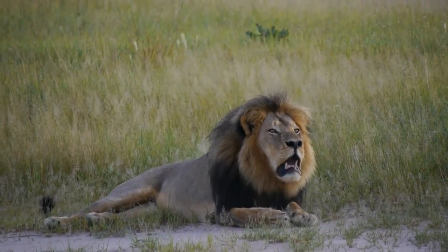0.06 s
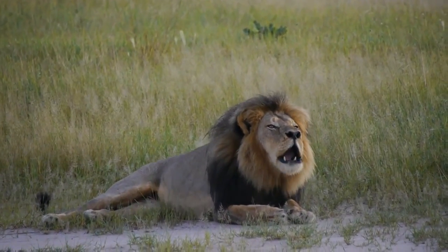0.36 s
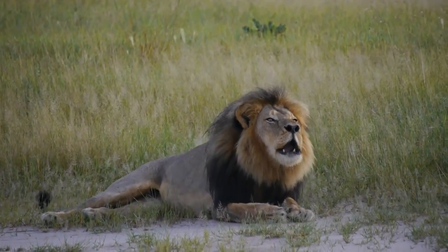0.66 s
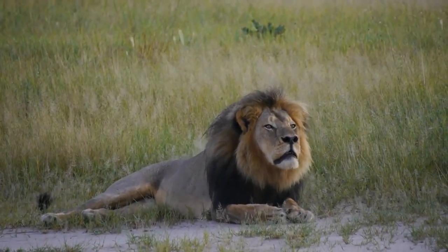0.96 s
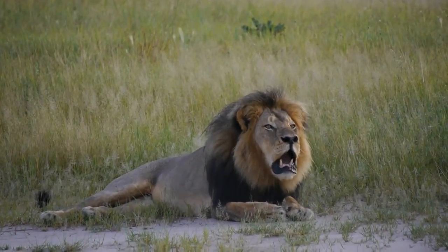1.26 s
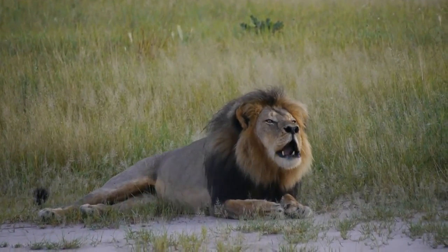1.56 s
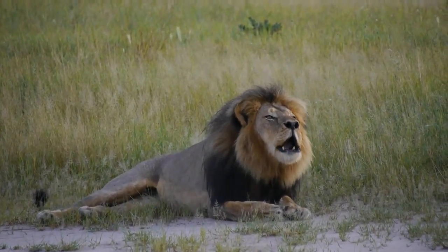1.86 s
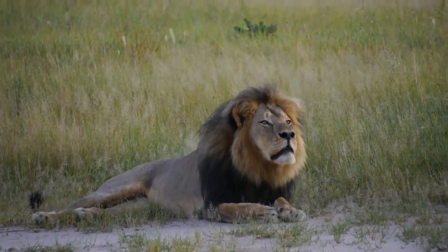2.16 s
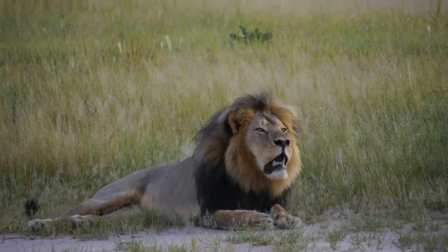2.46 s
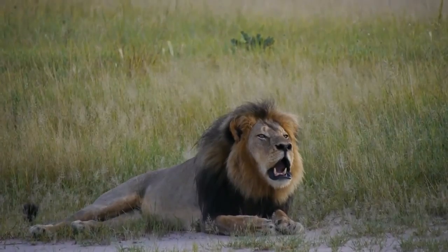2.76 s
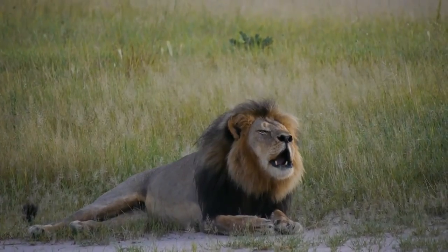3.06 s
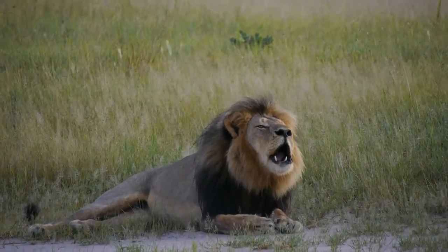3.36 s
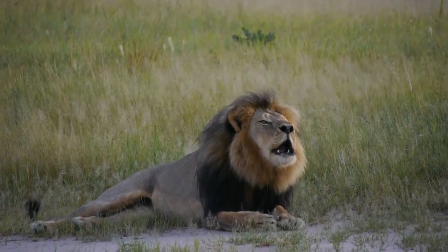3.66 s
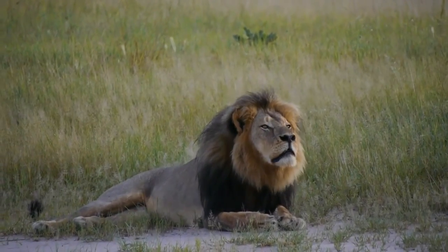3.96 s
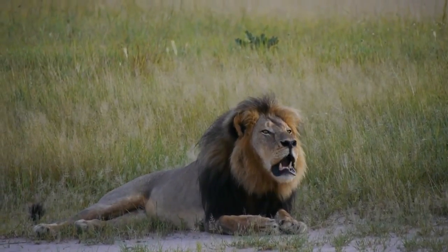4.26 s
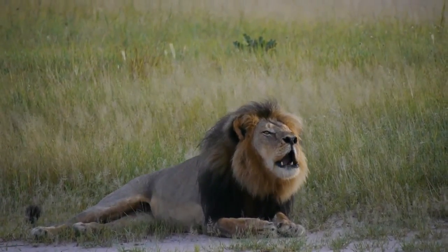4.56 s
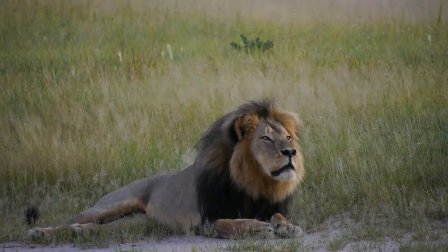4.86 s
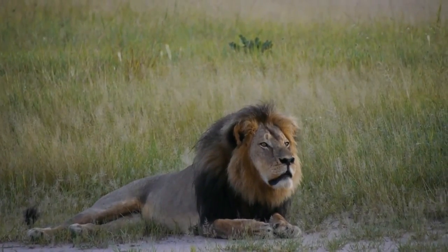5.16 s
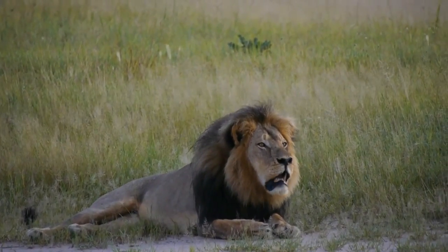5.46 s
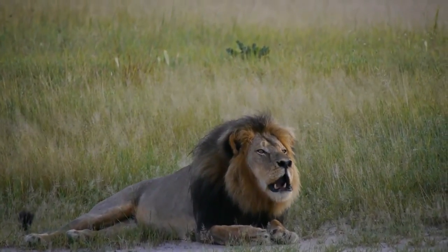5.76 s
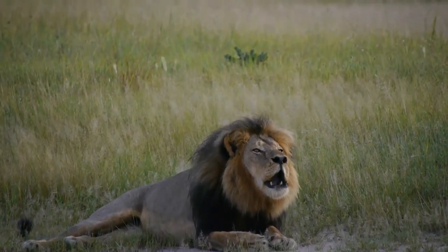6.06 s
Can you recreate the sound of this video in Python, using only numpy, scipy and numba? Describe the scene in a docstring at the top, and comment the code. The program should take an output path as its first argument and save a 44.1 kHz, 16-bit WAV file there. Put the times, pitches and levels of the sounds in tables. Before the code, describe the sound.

A lion roars five times in quiet open grassland, clear in the foreground, with a soft inhale before each call. The roars are deep, rough and raspy, swelling and then sagging in pitch, and the first four end in throaty gulps. Two short roars come at about 0.4 and 1.6 seconds, each lasting around half a second. The longest runs from 3.0 to 3.9 seconds, strained and breaking in the middle. A shorter, quieter one follows at 4.6 seconds, and the last begins at about 5.9 seconds. Each leaves a faint, low echo rolling across the plain. Far away, small birds give thin falling whistles and brief buzzes, busiest between 2 and 3 seconds and again from 4 to 5. Tiny dry ticks sound at the start and near 2.1 and 3.9 seconds, over a faint, wide hush of still air.

```python
"""A lion roars in grassland

A lion gives five deep roars that swell, hold and sag; the first four end in throaty gulps. Its heavy vocal
folds beat unevenly, splitting into strong and weak beats in the longest roar. Throat and mouth ring, and
air rasps once a cycle. Grass scatters the treble and far trees return the bass. Small birds whistle and
buzz in the distance, and dry ticks sound over a faint hush."""
import sys
import numpy as np
from scipy import signal
from scipy.fft import rfft, irfft, next_fast_len
from scipy.io import wavfile
from scipy.ndimage import uniform_filter1d, minimum_filter1d
from numba import njit

SR = 44100
rng = np.random.default_rng(int(sys.argv[2]) if len(sys.argv) > 2 else 0)


def file_out(sig):
    """Save sig as 16-bit WAV at sys.argv[1]."""
    # one column per channel
    cols = np.atleast_2d(sig).T
    # limit, then scale
    lim = np.clip(cols, -1, 1)
    pcm = np.round(lim * 32767).astype(np.int16)
    wavfile.write(sys.argv[1], SR, pcm)


N = 269803
TIME = np.arange(N) / SR


def undb(db):
    """Turn decibels into a multiplier."""
    return 10 ** (np.asarray(db) / 20)


def unit(x):
    """Scale a sound so its average power is 1."""
    return x / np.sqrt(np.mean(x ** 2))


def steady(x, size=2200):
    """Even out slow changes in loudness; single beats keep their differences."""
    power = uniform_filter1d(uniform_filter1d(x ** 2, size), size // 2)
    return x / np.sqrt(np.abs(power) + 1e-12)


def noise():
    return rng.standard_normal(N)


def band(x, lo_hz, hi_hz, order=4):
    """Keep what lies between two frequencies."""
    return signal.sosfilt(signal.butter(order, [lo_hz, hi_hz], "band", fs=SR, output="sos"), x)


def band_noise(lo_hz, hi_hz, order=2):
    """Noise between two frequencies; a very low band makes a random wobble."""
    return unit(band(noise(), lo_hz, hi_hz, order))


def colour(x, points):
    """Shape the bass and treble along (frequency_hz, gain_db) points."""
    hz, db = np.transpose(points)
    size = next_fast_len(len(x) + SR // 10)
    freq = np.maximum(np.arange(size // 2 + 1) * SR / size, 1)
    gain = undb(np.interp(np.log(freq), np.log(hz), db))
    return irfft(rfft(x, size) * gain, size)[:len(x)]


@njit
def moving_filter(x, hz, width_hz):
    """Pass a band of sound whose centre can move at every sample."""
    out, band_state, low_state = np.empty(len(x)), 0., 0.
    for i in range(len(x)):
        tuning, damping = np.tan(np.pi * hz[i] / SR), width_hz / hz[i]
        swing = (band_state + tuning * (x[i] + 1e-18 - low_state)) / (1 + tuning * (tuning + damping))
        band_state = 2 * swing - band_state
        low_state += 2 * tuning * swing
        out[i] = damping * swing
    return out


def ring(x, hz, width_hz):
    """One resonance: a pitch, still or moving, at which a hollow space rings."""
    return moving_filter(x, hz * np.ones(N), float(width_hz))


def pipe(x, resonances, scale=1):
    """The steep resonances of a pipe; neighbours swing in opposite directions."""
    return sum((-1) ** k * undb(db) * ring(ring(x, hz * scale, width), hz * scale, width)
               for k, (hz, width, db) in enumerate(resonances))


def add(out, start_s, sound):
    """Mix a sound in at a given time."""
    i = int(start_s * SR)
    out[i:i + len(sound)] += sound[:N - i]


def bump(at_s, half_s):
    """A smooth rise and fall around a time."""
    return np.exp(-((TIME - at_s) / half_s) ** 2)


# The tone of still air over the plain: frequency_hz, relative_db
AIR_TONE = [(26, -55), (45, 0.5), (70, -9.5), (123, 2), (190, -7.5), (359, -4.5), (494, -15.5),
            (825, -11.5), (1310, -23), (1450, -14), (1720, -24.5), (4040, -26.5), (5830, -32),
            (13400, -37.5), (15500, -55)]

def still_air(level_db=-50.5, swell_db=2):
    """A faint, wide hush that swells in the bass, with a low boom dying away at the start."""
    mid, side = (unit(colour(noise(), AIR_TONE)) for _ in range(2))
    side = colour(side, [(30, 14), (120, -21), (500, -4.5), (1300, -2.5), (3000, 3), (12000, 2.5)])
    swell = undb(swell_db * band_noise(1, 1.03, order=1)) - 1
    mid = mid + swell * colour(mid, [(500, 3.5), (2000, -23)])
    boom = undb(-41.5 - 42 * TIME) * band_noise(132, 162)
    return undb(level_db) * np.array([mid + side, mid - side]) + boom


# Small dry ticks: start_s, relative_db
DRY_TICKS = [(0.027, -30), (0.0418, -34.5), (0.0815, -33.5), (0.115, -29), (0.8857, -40), (2.0714, -31),
             (2.113, -35), (2.144, -27.5), (2.904, -38.5), (3.8294, -32), (3.867, -34), (3.899, -27.5)]

def ticks(decay_s=0.0053):
    """Tiny bursts of noise make dry crackles."""
    out, t = np.zeros(N), TIME[:SR // 16]
    shape = t / decay_s * np.exp(-t / decay_s)
    for start, db in DRY_TICKS:
        add(out, start, undb(db - 4.5) * shape * rng.standard_normal(len(t)))
    return colour(out, [(300, 11.5), (1500, 3.5), (4200, 3.5), (6500, -5), (10000, -7.5), (13000, -10.5)])


# The lion breathes in before each roar: start_s, length_s, level_db
BREATHS = [(0.238, 0.32, -47.5), (1.4, 0.27, -47), (2.732, 0.34, -49), (4.371, 0.21, -48),
           (5.63, 0.37, -50.5)]

def breaths():
    """Air drawn softly through the open jaws."""
    swell = np.zeros(N)
    for start, length, db in BREATHS:
        add(swell, start, undb(db) * np.hanning(int(length * SR)) ** .5)
    air = pipe(noise(), [(401, 140, 5), (845, 58, 1.5), (1060, 260, -6), (1400, 340, -19)])
    return swell * unit(band(air, 170, 1900))


def whistle(hz, db, quaver=0.0054):
    """One bird note swells and fades along a slightly shaky glide in pitch."""
    progress = np.linspace(0, 1, len(hz))
    wobble = unit(uniform_filter1d(rng.standard_normal(SR), 260))[:len(hz)]
    phase = 2 * np.pi * np.cumsum(hz * (1 + quaver * wobble)) / SR
    return undb(db) * 2 * np.sqrt(progress * (1 - progress)) * np.sin(phase)


# One bird repeats a falling whistle: start_s, length_s, middle_hz, level_db
FALLING_NOTES = [(0.308, 0.14, 4370, -58), (1.16, 0.11, 4580, -62.5), (1.405, 0.14, 4660, -59.5),
                 (2.199, .13, 4360, -51), (3.025, 0.087, 5470, -60), (3.836, .1, 4790, -53.5),
                 (4.302, 0.12, 4640, -52.5), (5.507, 0.15, 4740, -54.5)]
# Another sings bending notes: start_s, length_s, first_hz, middle_hz, last_hz, level_db
BENDING_NOTES = [(2.16, 0.17, 4460, 3740, 3600, -56), (2.31, .27, 3720, 3320, 3180, -56.5),
                 (2.572, 0.15, 3030, 2800, 2525, -52.5), (2.633, 0.17, 4460, 4140, 3900, -64),
                 (2.719, .13, 2710, 2940, 2730, -50.5), (2.917, 0.059, 4300, 3930, 3350, -61),
                 (2.968, 0.17, 3900, 4145, 3990, -55), (4.005, .047, 1770, 2620, 3270, -51.5),
                 (4.5, .035, 5320, 5220, 5040, -59), (4.827, 0.089, 2710, 2190, 1724, -54),
                 (5.009, 0.044, 3670, 3140, 2820, -55.5)]
# Bird buzzes: start_s, length_s, level_db
BUZZ_NOTES = [(2.384, 0.27, -57), (4.805, 0.23, -62.5)]

def birds(fall_octaves_per_s=3.8, trill_hz=99, trill_depth=0.77):
    """Far birds sing gliding whistles and buzzes of rapidly pulsing hiss."""
    song, buzz_level = np.zeros((2, N))
    for start, length, hz, db in FALLING_NOTES:
        octaves = fall_octaves_per_s * (length / 2 - TIME[:int(length * SR)])
        add(song, start, whistle(hz * 2 ** octaves, db))
    for start, length, first, middle, last, db in BENDING_NOTES:
        bend = np.polyfit([0, .5, 1], [first, middle, last], 2)
        add(song, start, whistle(np.polyval(bend, np.linspace(0, 1, int(length * SR))), db))
    for start, length, db in BUZZ_NOTES:
        add(buzz_level, start, undb(db) * signal.windows.tukey(int(length * SR), .2))
    trill = 1 + trill_depth * np.sin(2 * np.pi * trill_hz * TIME)
    buzz = buzz_level * band_noise(3940, 4710, order=3) * trill
    flicker = undb(2.2 * band_noise(29, 58))  # moving air makes far whistles flicker
    return song * flicker + buzz


# The five roars: start_s, swell_s, hold_s, release_s, top_pitch_hz, sagged_pitch_hz, level_db,
# extra_mouth_db, rasp_surge_db, top_roughness (0-1), top_split (strong-weak depth), voice_break (0-1)
ROAR_SHAPES = [(0.44, 0.18, .05, .12, 139.8, 106.1, 0, 0, 1.5, 0.19, 0.19, 0.16),
               (1.622, 0.17, .078, 0.15, 138, 110.9, -0.55, 0.9, 3, .15, 0.24, 0.17),
               (3.046, 0.25, .268, 0.2, 148.7, 121.1, 1.7, -2, -3, 0.55, 1.32, 1),
               (4.57, .114, .03, 0.084, 128.3, 107.9, -3.25, 0.5, 1, 0.84, 0.48, 0),
               (5.933, .173, .1, 0.099, 133, 108, -2.5, 1, 2.5, 0.4, 0.2, 0.41)]
# How loud each part of the voice is through a roar: full_db, swell_db, sag_db, break_db, last_push_db
CHEST_LEVELS = (-9.5, 21.5, 16.5, -15.5, -1)
THROAT_LEVELS = (-15.5, 7.5, 11, 3, 5)
MOUTH_LEVELS = (-23, 11, 18, 2.6, 0.9)
RASP_LEVELS = (-39.5, 14.5, 8.5, -3, 0.7)

def roars(start_hz=120, open_s=0.014, sag_s=0.135, close_s=0.076, break_s=0.031,
          slack_rough=0.94, slack_split=0.18, firm_from=0.72):
    """Each roar swells, holds and sags; that effort sets pitch, roughness and the four parts' loudness."""
    pitch = np.full(N, float(start_hz))
    rough, split, effort, broken = np.zeros((4, N))
    gains = np.zeros((4, N))  # chest, throat, mouth, rasp
    levels = np.transpose([CHEST_LEVELS, THROAT_LEVELS, MOUTH_LEVELS, RASP_LEVELS])
    full_db, swell_db, sag_db, break_db, push_db = levels[:, :, None]
    for (start, swell, hold, release, top_hz, sagged_hz, db,
         mouth_db, surge_db, top_rough, top_split, voice_break) in ROAR_SHAPES:
        now = slice(int(start * SR), N)
        t = np.maximum(TIME[now] - start, 0)
        hold_end, after_hold = start + swell + hold, t - swell - hold
        rise = np.sin(np.pi / 2 * np.minimum(t / swell, 1))
        sag = np.clip(after_hold / sag_s, 0, 1)
        effort[now] = rise * (1 - sag)
        pitch[now] = start_hz + (top_hz - start_hz) * rise ** 1.2 + (sagged_hz - top_hz) * sag
        # the folds firm up with effort, and swing more cleanly for a moment as the pressure eases
        firm = np.clip((effort[now] - firm_from) / (1 - firm_from), 0, 1) ** 2
        ease = 0.64 * bump(hold_end + 0.047, half_s=0.045)[now]
        rough[now] = (slack_rough + (top_rough - slack_rough) * firm) * (1 - ease)
        split[now] = slack_split + (top_split - slack_split) * firm
        # a voice break lasts as long as the hold, and a last push of air follows
        broken[now] = voice_break * np.clip(np.minimum(t - swell, -after_hold) / break_s + .5, 0, 1)
        push = bump(hold_end + 0.013, half_s=0.023)[now]
        # the roar opens softly, then the folds catch
        soft_start = 1 - np.clip((t - 0.029) / 0.012, 0, 1)
        fade_in = np.minimum(t / open_s, 1) * undb(-6.5 * soft_start)
        fade_out = np.exp(-(np.maximum(after_hold - release, 0) / close_s) ** 2)
        shape_db = full_db - swell_db * (1 - rise) - sag_db * sag + break_db * broken[now] + push_db * push
        gains[:, now] = fade_in * fade_out * undb(db + shape_db)
        gains[2, now] *= undb(mouth_db)
        gains[3, now] *= undb(surge_db * bump(start + swell, half_s=0.064)[now])
    return pitch, rough, split, effort, broken, gains


def fold_beats(cycles, rough, split, jitter_s, shimmer_db):
    """The vocal folds beat once a cycle, strong then weak; roughness scatters the times and sizes."""
    beat = np.arange(1, int(cycles[-1]))
    at = np.interp(beat, cycles, np.arange(N))
    here = at.astype(int)
    chance = rng.standard_normal((len(beat), 2))
    at = np.clip(at + SR * jitter_s * rough[here] * chance[:, 0], 0, N - 2)
    size = (1 + split[here] * (-1.) ** beat) * undb(shimmer_db * rough[here] * chance[:, 1])
    i, part = at.astype(int), at % 1  # each beat is shared between two samples
    return steady(np.bincount(i, size * (1 - part), N) + np.bincount(i + 1, size * part, N))


def chest(cycles, rough, flutter=0.1):
    """The round, lowest tone of the voice; slack folds make its size and timing waver."""
    size_waver, phase_waver = (flutter * rough * band_noise(24, 36) for _ in range(2))
    return np.sqrt(2) * (1 + size_waver) * np.sin(2 * np.pi * cycles + 2 * phase_waver)


# Where the long throat rings: pitch_hz, width_hz, gain_db
THROAT_RINGS = [(187, 78, -2), (301.2, 53, 0.5), (349.4, 70, -1), (439.3, 84, -1.5), (585, 31, -11.5)]

def throat(drive, opening, gulp, broken, groan_hz):
    """The throat rings low, and a groan stands out in gulps and voice breaks."""
    tone = band(pipe(drive, THROAT_RINGS, scale=opening ** 0.44), 158, 607)
    # the voice box sinks as each roar dies, so one resonance slides down with the pitch
    tone = tone + undb(-8.5) * ring(tone, 400 * opening, width_hz=99)
    groan_gain = undb(6.5) * gulp + undb(0.5) * broken
    return steady(tone + groan_gain * ring(tone, groan_hz, width_hz=33))


# Where the open mouth rings: pitch_hz, width_hz, gain_db
MOUTH_RINGS = [(766, 274, -5), (979, 65, -10), (1084.8, 77, 9), (1294, 62, -2), (1340, 168, -6.5),
               (1435, 66, -18), (1837, 200, -22.5)]

def mouth(drive, opening, effort, broken, gulp, sweep):
    """The mouth rings; the jaw's ring rises with effort and in gulps, and grows as the mouth closes."""
    jaw_hz = 735.7 + 28 * effort + 45 * broken + 134 * sweep
    jaw_db = 9 - 5 * (effort + broken) + 6 * gulp
    jaw = pipe(drive, [(jaw_hz, 72, jaw_db)])
    return steady(pipe(drive, MOUTH_RINGS, scale=opening ** 0.25) + jaw)


def wet_rattle(pockets=7, pops_per_s=220, width_hz=90, wander=0.0615):
    """Saliva flutters in the breath: scattered pops ring small pockets whose pitch wanders."""
    out = 0
    for hz in np.geomspace(2500, 7400, pockets):
        pops = (rng.random(N) < pops_per_s / SR) * noise()
        drift = np.interp(TIME, np.linspace(0, TIME[-1], 90), rng.standard_normal(90))
        out = out + ring(pops, hz * np.exp(wander * drift), width_hz)
    return unit(out)


# The tone of air rushing past the teeth: frequency_hz, gain_db
RASP_TONE = [(1200, -3), (1700, 1.5), (2150, -9), (2600, -7), (3400, -6.5), (3700, -3.5), (4200, 0.5),
             (4800, -10), (5800, -10.5), (7500, -13.5), (8300, -17), (10200, -9.5), (12000, -23.5),
             (15000, -25)]
# Narrow rings at the front of the mouth: pitch_hz, width_hz, gain_db
TEETH_RINGS = [(3830, 45, -22), (3730, 32, 5), (4400, 200, -41), (5756, 34, 8)]

def rasp(puffs, beats):
    """Puffs of air, fold beats and a wet rattle rush out past the teeth."""
    hiss = colour(unit(puffs * noise()) + 0.36 * beats + 0.45 * wet_rattle(), RASP_TONE)
    return steady(hiss + sum(undb(db) * ring(hiss, hz, width) for hz, width, db in TEETH_RINGS))


# Gulps as a roar dies: middle_s, voice_boost_db, mouth_boost_db, rasp_boost_db, groan_pitch_hz
THROAT_GULPS = [(0.768, 8, 5, 2.5, 285), (0.815, 2.5, 6.5, 6.5, 313), (0.867, 0.5, -1, -8, 394),
                (1.972, 11, 10, 2, 287), (2.031, 13.5, 11, 10, 353), (2.089, -4, 2.5, -2, 380),
                (3.624, 2, 10, 5, 436.5), (3.7, 10.5, 16.5, 3.7, 290), (3.754, 7.5, 9.5, 11.5, 340),
                (3.866, 1, 0, 2, 338.6), (4.762, 4, 3.5, 7.5, 255), (4.81, 3, -0.5, 3.5, 326)]

def gulps(half_s=0.026, pinch_db=2, rest_hz=264, slide_hz=35):
    """The throat catches, then lets go: the level dips, then jumps while the groan slides up."""
    lift_db, gulp, sweep, groan_hz = np.zeros((4, N)), 0, 0, rest_hz
    for at, voice_db, mouth_db, rasp_db, hz in THROAT_GULPS:
        pinch, burst = bump(at - 0.047, half_s=0.013), bump(at, half_s)
        from_middle = (TIME - at) / half_s
        lift_db += np.outer([voice_db, voice_db, mouth_db, rasp_db], burst) - pinch_db * pinch
        gulp += burst
        sweep += burst * (from_middle + .5)
        groan_hz += burst * (hz - rest_hz + slide_hz * from_middle)
    return undb(lift_db), gulp, sweep, groan_hz


def lion(air_leak=0.46, puff_cycles=0.88):
    """Fold beats and puffs of air ring the throat and mouth above a round chest tone."""
    pitch, rough, split, effort, broken, gains = roars()
    lift, gulp, sweep, groan_hz = gulps()
    chest_gain, throat_gain, mouth_gain, rasp_gain = gains * lift
    cycles = np.cumsum(pitch) / SR
    beats = fold_beats(cycles, rough, split, jitter_s=0.00032, shimmer_db=3.5)
    # under strain part of the folds swings on its own, five beats to every four
    beats += 0.56 * split * fold_beats(cycles * 1.25, rough, np.zeros(N), jitter_s=0.00045, shimmer_db=3)
    # air escapes in a puff after each beat, in uneven gusts
    gusts = undb(1.1 * band_noise(4.5, 90))
    puffs = (air_leak + np.exp(-(cycles % 1) / puff_cycles)) * gusts
    drive = beats + rough * unit(puffs * noise())
    # the mouth opens with effort, so its resonances rise and sink with the pitch
    opening = np.minimum(pitch, 143) / 139
    voice = (chest_gain * chest(cycles, rough)
             + throat_gain * throat(drive, opening, gulp, broken, groan_hz)
             + mouth_gain * mouth(drive, opening, effort, broken, gulp, sweep))
    # little below the lowest tone leaves the mouth, and soft flesh dulls the top
    voice = colour(voice, [(55, -24), (80, -19), (100, 0), (1800, 0), (2150, -6.5)])
    hiss = rasp_gain * rasp(puffs, beats)
    rumble = undb(-43.5) * (chest_gain + throat_gain) * band_noise(35, 110)
    surges = undb(1.18 * band_noise(8.1, 28))  # the wet throat lets the rasp through unevenly
    return voice + surges * hiss + rumble


def echoes(x, bush_fade_s=0.38, plain_fade_s=1.87, trees_delay_s=0.48, trees_spread_s=0.34):
    """Nearby bushes answer at once, the plain rolls on, and the deep tree line returns the bass late."""
    t = TIME[:2 * SR]

    def echo(shape, db, tone):
        reflections = rng.standard_normal(len(t)) * shape
        return undb(db) * colour(reflections / np.sqrt(np.sum(reflections ** 2)), tone)

    bushes = echo(undb(-60 * t / bush_fade_s) * (t > .015), db=-21,
                  tone=[(150, 1.2), (400, 1.3), (1200, 14.8), (8000, 2.3)])
    plain = echo(undb(-60 * t / plain_fade_s) * (t > .04), db=-30,
                 tone=[(140, 1), (400, 1), (1200, -4), (4000, -8), (10000, -36.5)])
    trees = echo(np.exp(-((t - trees_delay_s) / trees_spread_s) ** 2), db=-29,
                 tone=[(100, -24), (136, 1.5), (160, 4), (450, -38), (1200, -32), (4000, -51.5)])
    return signal.fftconvolve(x, bushes + plain + trees)[:N]


# How much sound the grass scatters sideways: frequency_hz, side_gain_db
GRASS_SCATTER = [(100, -72), (380, -19.5), (700, -18), (1300, -7), (2400, -5.5), (8000, -3), (15000, -6.5)]

def grass(x, scatter_s=0.0063, balance_db=1.07):
    """Stalks scatter the treble differently towards each ear."""
    t = TIME[:1024]
    spectrum = rfft(rng.standard_normal(len(t)) * np.exp(-t / scatter_s))
    scramble = irfft(spectrum / np.abs(spectrum))  # smears timing, keeps each pitch as loud
    side = colour(signal.fftconvolve(x, scramble)[:N], GRASS_SCATTER)
    return np.array([(x + side) * undb(balance_db / 2), (x - side) * undb(-balance_db / 2)])


def scene():
    """Every sound and its echoes pass through the grass, over the hush of the plain."""
    sources = lion() + breaths() + birds() + ticks()
    return grass(sources + echoes(sources)) + still_air()


def record(dry):
    """A limiter turns down any peak near full scale, and the highest treble is cut."""
    ceiling, top_hz = .97, 15700
    safe_gain = ceiling / np.maximum(np.abs(dry).max(axis=0), ceiling)
    gain = uniform_filter1d(minimum_filter1d(safe_gain, size=301), size=301)
    return signal.sosfilt(signal.ellip(8, .2, 70, top_hz, fs=SR, output="sos"), gain * dry)


dry = scene()
out = record(dry)
file_out(out)
```